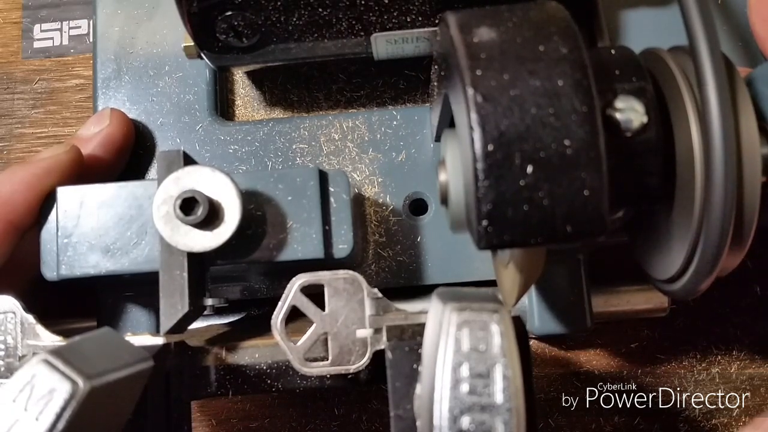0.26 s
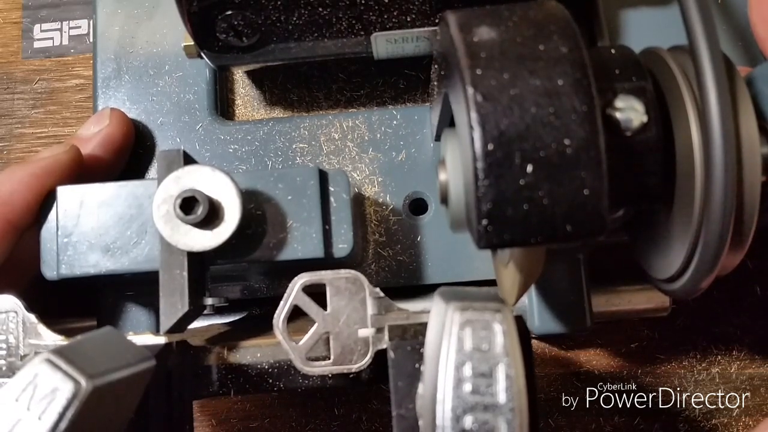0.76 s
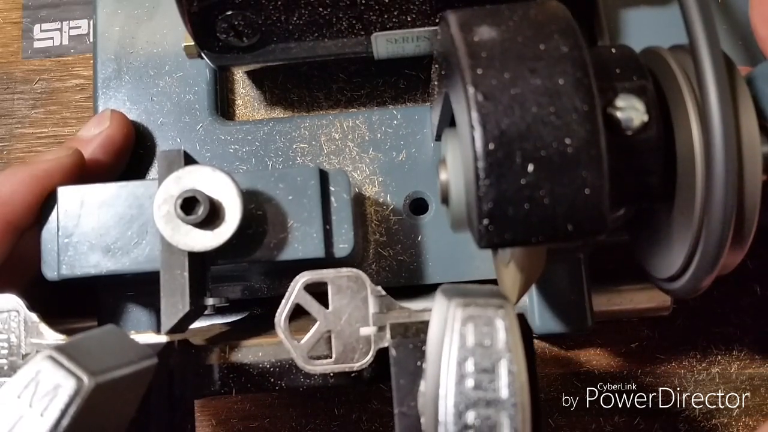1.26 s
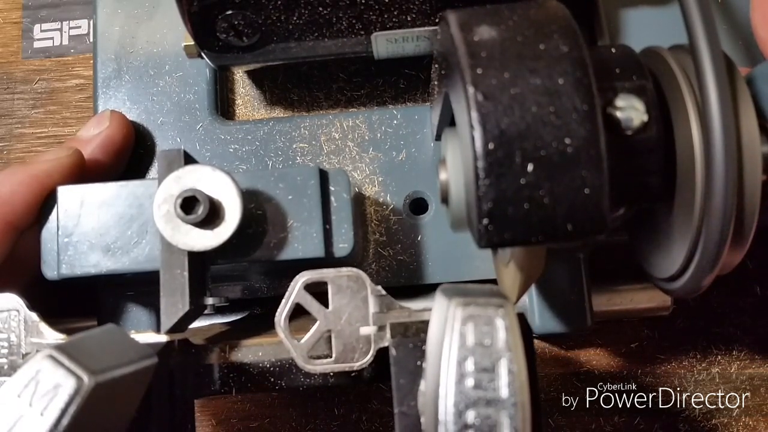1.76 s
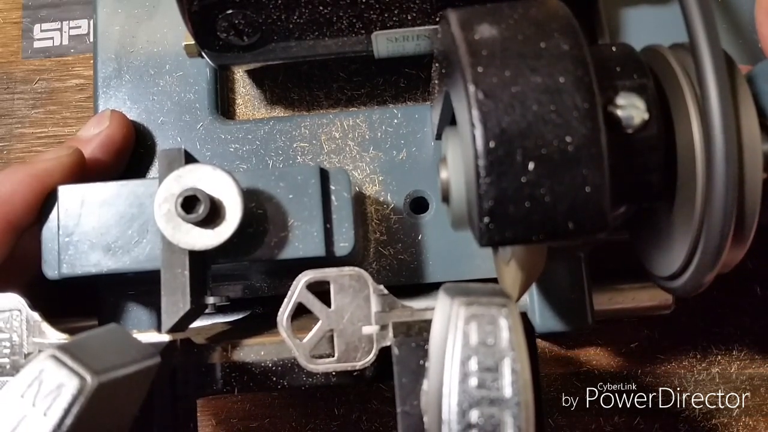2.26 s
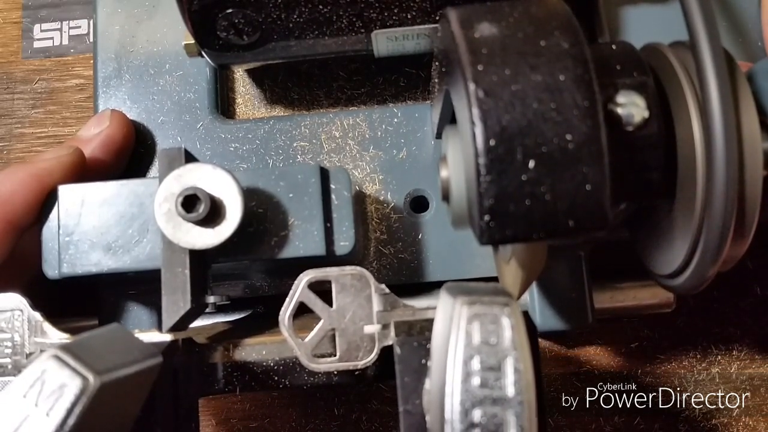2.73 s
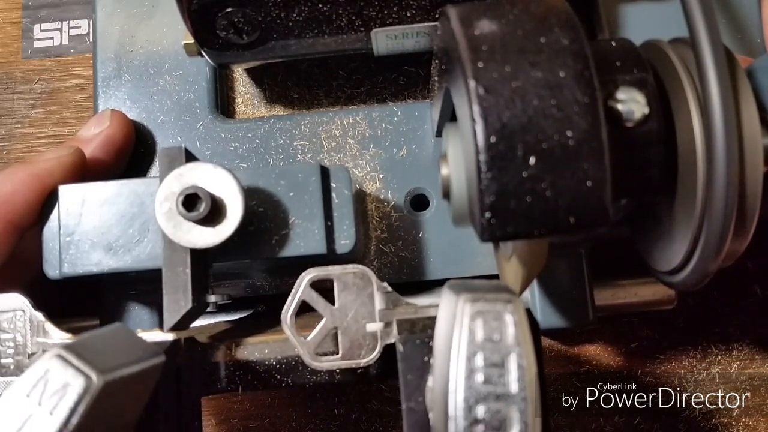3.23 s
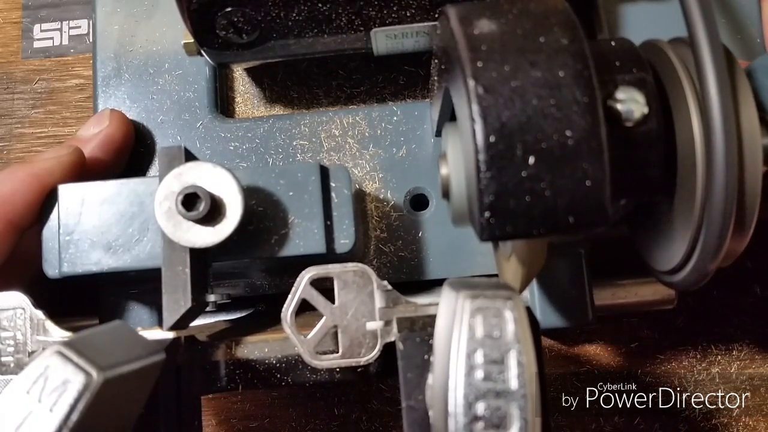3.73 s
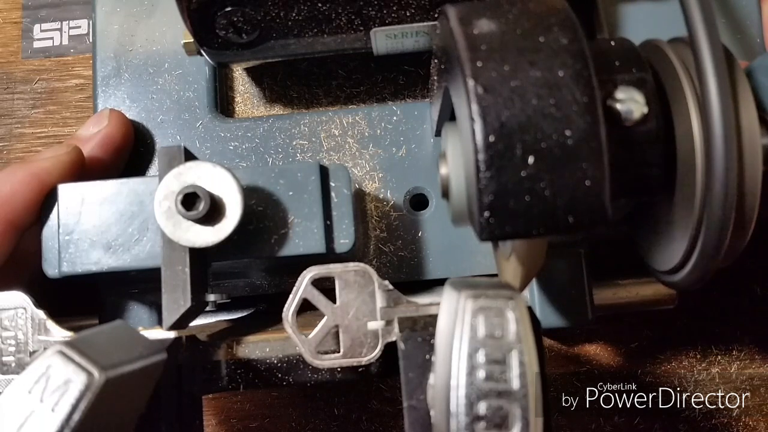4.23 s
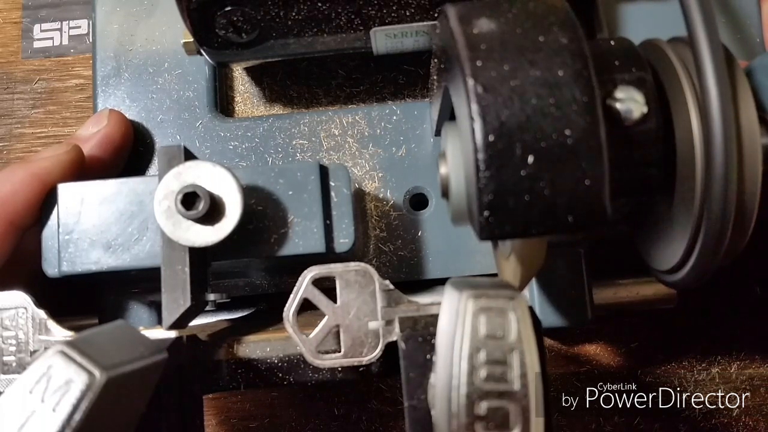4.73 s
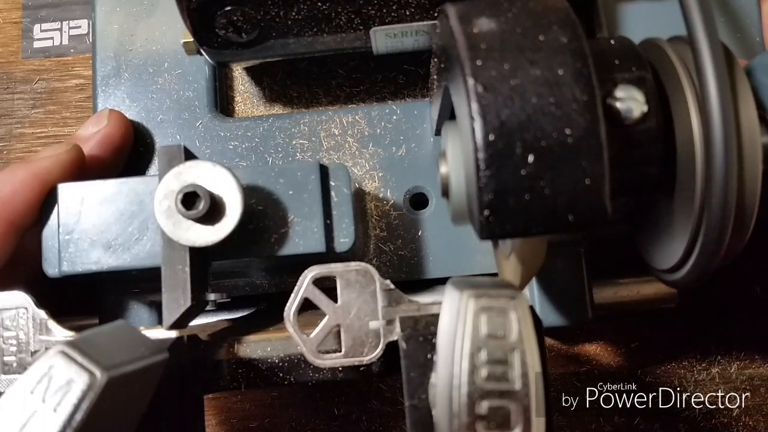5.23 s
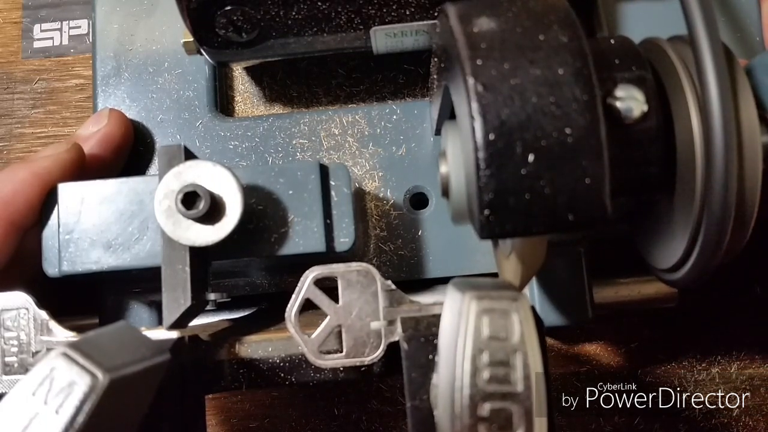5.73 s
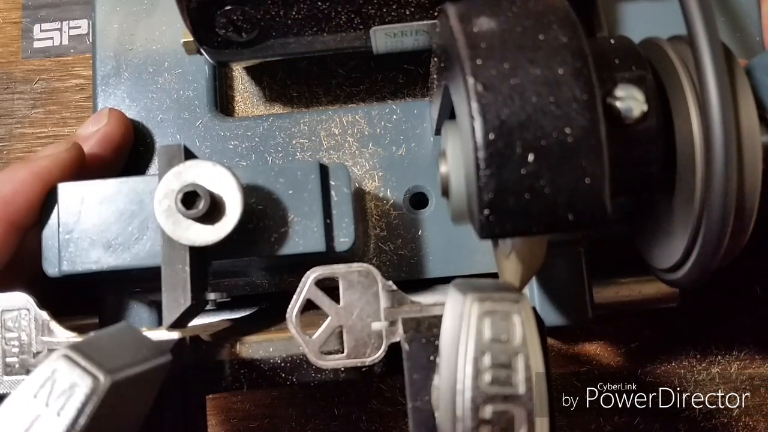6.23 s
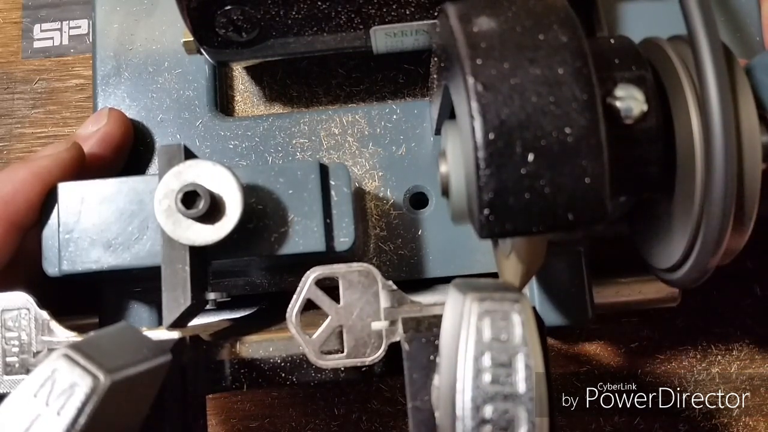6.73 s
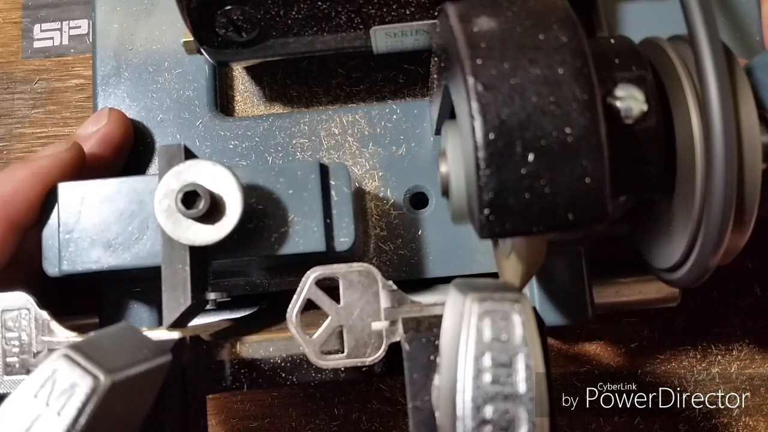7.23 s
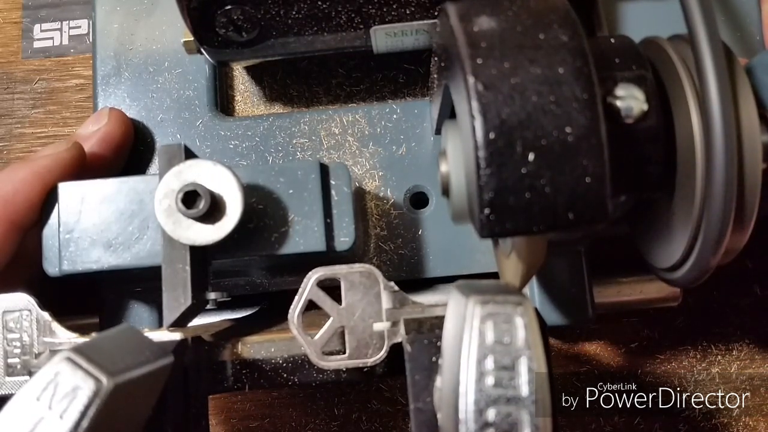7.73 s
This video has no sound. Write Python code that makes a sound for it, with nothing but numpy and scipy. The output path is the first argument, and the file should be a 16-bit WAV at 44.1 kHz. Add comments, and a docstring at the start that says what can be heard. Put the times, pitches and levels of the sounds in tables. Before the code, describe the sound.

A key duplicating machine runs on a workbench, heard from just above the cutter. Its electric motor holds a strong, steady hum with a buzzing edge, a low rumble and a constant rasp. Over this, the clamped key and its carriage chatter against the wheel with a fast metallic rattle. The chatter eases near the middle, then bites hardest soon after. The machine is still running at the end.

```python
"""A key duplicating machine runs on a workbench, heard from just above the cutter.
From the start its fast mains motor hums, the brushes rasp and a belt turns the cutter spindle at under
half the motor's speed. Whenever the two shafts swing the same way, the clamped key and its carriage
chatter. The chatter eases towards 4 s as the cut gets shallower, then is hardest around 6 s, where the
cutter bites deep. The machine is still running at the end."""
import sys
import numpy as np
from scipy import signal
from scipy.fft import rfft, irfft
from scipy.io import wavfile
from scipy.ndimage import uniform_filter1d, minimum_filter1d

SR = 44100
rng = np.random.default_rng(int(sys.argv[2]) if len(sys.argv) > 2 else 0)


def int16_out(signal):
    """Quantize to a 16-bit WAV file."""
    q = np.round(np.clip(np.atleast_2d(signal).T, -1, 1) * 32767)
    wavfile.write(sys.argv[1], SR, q.astype(np.int16))


N = 351918
TIME = np.arange(N) / SR
RIPPLE_HZ = 120   # mains peaks


def from_db(db):
    return 10 ** (np.asarray(db) / 20)


def unit_rms(x):
    return x / np.sqrt(np.mean(x ** 2) + 1e-20)


def swing(turns):
    return np.cos(2 * np.pi * turns)


def automation(rows):
    """One curve per column, drawn through the times in the first column."""
    times, *columns = np.transpose(rows)
    return [np.interp(TIME, times, column) for column in columns]


def travel_db(mid_db, rise_db_per_s, mid_travel_s=4.0):
    """A level that changes steadily as the carriage moves along the key."""
    return mid_db + rise_db_per_s * (TIME - mid_travel_s)


def drift(hz):
    """A random wander of spread 1, changing about hz times a second."""
    freqs = np.fft.rfftfreq(N, 1 / SR)
    return unit_rms(equalise(rng.standard_normal(N), 1 / (1 + (freqs / hz) ** 2) ** 2))


def eq_curve(points):
    """Points of frequency and level as gains on the FFT grid."""
    hz, db = np.transpose(points)
    return from_db(np.interp(np.log(np.fft.rfftfreq(N, 1 / SR) + 1), np.log(hz), db))


def equalise(x, gains):
    return irfft(rfft(x) * gains, N)


def resonate(x, hz, width_hz):
    """A resonance with gain 1 at its peak."""
    radius = np.exp(-np.pi * width_hz / SR)
    feedback = [1, -2 * radius * np.cos(2 * np.pi * hz / SR), radius ** 2]
    return signal.lfilter(np.array([1, 0, -1]) * (1 - radius ** 2) / 2, feedback, x)


def ring(clicks, hz, t60_s):
    """A unit click sets a sine of height 1 ringing."""
    radius, angle = np.exp(-np.log(1000) / (t60_s * SR)), 2 * np.pi * hz / SR
    feedback = [1, -2 * radius * np.cos(angle), radius ** 2]
    return signal.lfilter([0, np.sin(angle)], feedback, clicks + 1e-18)


def enclosure(x, t60_s, wet_db):
    """Dense short echoes between casting, motor and bench, behind the direct sound."""
    t = TIME[:SR // 4]
    echoes = rng.standard_normal(len(t)) * from_db(-60 * t / t60_s)
    return x + from_db(wet_db) * signal.fftconvolve(x, echoes / np.linalg.norm(echoes))[:N]


def shaft_turns():
    """Running angles of motor and cutter, in turns; both speeds waver slightly."""
    # shaft speeds: time_s, motor_hz, cutter_hz
    speeds = [(0.0, 182.69, 80.4), (0.5, 182.75, 80.48), (1.0, 183.3, 80.69), (1.5, 183.42, 80.44),
              (2.0, 183.21, 80.8), (2.5, 183.6, 80.6), (3.0, 183.58, 80.86), (3.5, 184.18, 80.87),
              (4.0, 183.58, 80.72), (4.5, 183.7, 80.67), (5.0, 183.72, 80.88), (5.5, 183.66, 80.57),
              (6.0, 183.55, 80.64), (6.5, 183.01, 80.77), (7.0, 183.15, 80.8), (7.5, 183.57, 80.54),
              (8.0, 184.33, 81.79)]
    return np.cumsum(automation(speeds), axis=1) / SR


def rotor_hum(motor, trim_db=0.57, wobble_db=0.57, belt_hz=4.78):
    """The rotor's unbalance shakes the frame once and twice a turn."""
    # shake once a turn: time_s, relative_level_db
    shake = [(0.1, -10), (1.19, -9.5), (1.62, -13), (2.1, -10), (3.4, -11), (3.55, -13), (5.75, -12.5),
             (6.4, -14.5), (7.83, -12), (7.9, -13)]
    first_db = automation(shake)[0] + trim_db
    first_db += wobble_db * swing(belt_hz * TIME - 1 / 3)   # a wobble, probably once a lap of the belt
    second_db = travel_db(-15, rise_db_per_s=0.7)
    first = from_db(first_db + 0.38 * drift(35)) * np.sin(2 * np.pi * motor)
    second = from_db(second_db + 1.01 * drift(20)) * np.sin(2 * np.pi * 2 * motor + np.pi / 4)
    return np.sqrt(2) * (first + second)


def motor_buzz(motor, cutter, waver_db=1.13, slip_turns=0.046):
    """The motor's higher overtones, and its beats with the cutter and the mains."""
    # overtones from the fifth up: motor_multiple, mid_travel_db, rise_db_per_s
    upper = [(5, -39.5, 0.94), (6, -29.5, 0.66), (7, -39, 0), (8, -41.5, 0.9), (9, -41.5, -0.7),
             (10, -38.5, -0.1), (11, -42, 0), (12, -49.5, -1.5), (13, -44.5, 0.5)]
    # two overtones that swell and fade: time_s, third_db, fourth_db
    middle = [(0, -39, -47), (.8, -35, -41.5), (1.35, -42, -31), (2.3, -46, -34.5), (3.1, -34.5, -34.5),
              (4.4, -44.5, -35.5), (5.8, -32, -32), (6.5, -39, -34.5), (6.8, -35, -46), (7.55, -25.5, -47),
              (8, -36.5, -44)]
    # beat tones: motor_multiple, cutter_multiple, ripple_multiple, mid_travel_db, rise_db_per_s
    beats = [(0, 1, 0, -56, -1.3), (1, -1, 0, -45.5, 1.6), (0, 2, 0, -43.5, 1.5), (1, 1, 0, -33.5, 0.5),
             (2, -1, 0, -40.5, 0.8), (3, -2, 0, -34.5, 0.9), (2, 1, 0, -48.5, 1), (3, -1, 0, -37.5, -0.5),
             (2, 0, -1, -39, -1), (3, 0, -1, -36.5, 1.5), (5, 0, 1, -51, 0), (7, 0, -1, -44, -1.5),
             (10, 0, -1, -40.5, 0.3), (10, 0, 1, -39.5, -0.1), (12, 0, -1, -43.5, 0.5)]
    overtones = [(order, travel_db(db, rise)) for order, db, rise in upper]
    overtones += enumerate(automation(middle), start=3)
    tones = np.zeros(N)
    for order, db in overtones:
        level = from_db(db + waver_db * drift(6.5))
        tones += level * swing(order * motor + slip_turns * drift(21) + rng.random())
    for of_motor, of_cutter, of_ripple, db, rise in beats:
        turns = of_motor * motor + of_cutter * cutter + of_ripple * RIPPLE_HZ * TIME
        tones += from_db(travel_db(db, rise)) * swing(turns + rng.random())
    return np.sqrt(2) * tones


def frame_rumble(motor, cutter, throb_db=5.0, beat_db=1.5):
    """The heavy frame passes on the low end of the friction, throbbing with each motor turn."""
    # tone of frame and bench: frequency_hz, relative_level_db
    spectrum = [(20, -41.5), (70, -24), (110, -10), (165, -6), (255, 2), (320, -1.5), (400, -1.5),
                (505, -7.5), (660, -2.5), (720, -11.5), (800, -7.5), (1000, -13), (2000, -56.5)]
    press_db = throb_db * swing(motor - .4) + beat_db * swing(motor - 2 * cutter - .14)
    friction = rng.standard_normal(N) * from_db(press_db)
    return unit_rms(equalise(friction, eq_curve(spectrum)))


def brush_rasp(motor, cutter, once_db=1.0, twice_db=.6, cutter_db=.9, beat_db=.8, ripple_db=1.3):
    """Sliding contact, pressed harder with each turn, each mains peak and the shafts' slow beat."""
    # tone of brushes and cutter: frequency_hz, relative_level_db
    spectrum = [(400, -22), (900, -8.5), (1200, -0.5), (1600, -0.5), (1800, -6), (2300, -7.5), (3200, -13),
                (3700, -16), (5000, -21), (6200, -25), (7300, -38.5), (8500, -37.5), (10000, -45.5),
                (14000, -57.5)]
    # bright ring of small steel parts: pitch_hz, width_hz, relative_level_db
    steel_modes = [(5280, 45, -27), (8640, 280, -46.5), (10660, 190, -44.5), (11600, 180, -44),
                   (12450, 400, -38.5), (14700, 90, -42.5)]
    press_db = once_db * swing(motor - .2) + twice_db * swing(2 * motor)
    press_db += cutter_db * swing(cutter - .08) + beat_db * swing(motor - 2 * cutter - .1)
    press_db += ripple_db * swing(RIPPLE_HZ * TIME)
    friction = rng.standard_normal(N) * from_db(press_db + 2.0 * drift(520))   # fast drift adds grit
    sizzle = sum(from_db(db) * resonate(friction, hz, width) for hz, width, db in steel_modes)
    rasp = equalise(friction, eq_curve(spectrum)) + sizzle
    return unit_rms(enclosure(rasp, t60_s=0.19, wet_db=-8))


def cutter_bite(jolt_half_s=0.03, unsteady_db=1.8):
    """Depth of the cut in dB: the shape of the key, brief jolts and an unsteady hand."""
    # bite along the key: time_s, depth_db
    profile = [(0, 1.5), (1.0, 1.1), (2.0, -.5), (2.8, -1.2), (3.7, -3), (5.3, -.5), (5.7, -0.5),
               (5.9, 3.5), (6.4, 2), (6.9, 1), (8, 1.5)]
    # the cutter catches (+) or runs slack (-): centre_s, change_db
    jolts = [(1.44, -3), (1.65, -9), (1.93, -6.5), (2.12, 5.5), (2.2, -16), (2.86, 0), (3.1, -6),
             (3.93, -1), (5.33, -8), (5.43, 3.5), (5.56, 7), (5.69, -8), (7.48, -11), (7.76, -6)]
    jolt_db = sum(db * np.exp(-((TIME - centre_s) / jolt_half_s) ** 2) for centre_s, db in jolts)
    return automation(profile)[0] + jolt_db + unsteady_db * drift(14)


def knocks(motor, cutter, in_step_db=17, beat_db=2.5, scatter_db=1.6,
           rebound_s=.0017, rebound_db=-8, jitter_s=.0003):
    """One knock a motor turn, hardest when the cutter swings with it, and two rebounds."""
    onsets = np.flatnonzero(np.diff(np.floor(motor - .1)))   # a tenth of the way into each turn
    in_step = (1 + swing(cutter[onsets] - .04)) / 2
    knock_db = in_step_db * in_step ** 2 + beat_db * swing(2 * cutter[onsets] + .05)
    bounce = np.arange(3)[:, None]
    timing_luck, force_luck = rng.standard_normal((2, len(bounce), len(onsets)))
    delay_s = bounce * rebound_s + jitter_s * (1 + bounce) * timing_luck
    hit_samples = np.clip(onsets + delay_s * SR, 0, N - 1).astype(int)
    forces = from_db(knock_db + rebound_db * bounce + scatter_db * np.tanh(force_luck))
    return hit_samples.ravel(), forces.ravel()


def struck(hits, modes, contact_hz, wet_db):
    """The point of contact wanders, so each knock rings every mode with its own sign and strength."""
    hit_samples, forces = hits
    ringing = np.zeros(N)
    for hz, db, t60_s in modes:
        share = rng.choice([-1, 1], len(forces)) * rng.uniform(.6, 1, len(forces))
        ringing += from_db(db) * ring(np.bincount(hit_samples, forces * share, N), hz, t60_s)
    soft_contact = signal.butter(4, [500, contact_hz], "band", fs=SR, output="sos")   # dulls the top
    return unit_rms(enclosure(signal.sosfilt(soft_contact, ringing), t60_s=.05, wet_db=wet_db))


def carriage_chatter(hits):
    """The knocks rattle the carriage: a short midrange clack."""
    # carriage resonances: pitch_hz, relative_level_db, t60_s
    modes = [(640, -16, .02), (1250, -10, .008), (1560, -7, .008), (2050, -9, .007), (2420, -2, .016),
             (2650, -3, .011), (2900, -3, .012), (3180, -4, .014), (3290, -2, .022)]
    return struck(hits, modes, contact_hz=3500, wet_db=-6)


def key_chatter(hits):
    """The same knocks ring the key and the cutter wheel: a thin, bright tick."""
    # key and wheel resonances: pitch_hz, relative_level_db, t60_s
    modes = [(4650, -10, .003), (5330, -1, .02), (5450, -7, .016), (5690, -5, .016), (5830, -1, .018),
             (6220, -11, .022), (8500, -19, .005)]
    return struck(hits, modes, contact_hz=6600, wet_db=-5)


def scene():
    """All parts sit close together, so both sides hear one sound in two colours."""
    # the right side is duller: frequency_hz, left_minus_right_db
    balance = [(300, 0.12), (1000, 0.4), (2000, 1.3), (3200, 3.5), (4200, 7), (5400, 10.5), (6500, 8.5),
               (7400, 5.5), (8000, 0)]
    motor, cutter = shaft_turns()
    bite_db = cutter_bite()
    hits = knocks(motor, cutter)
    key_db = travel_db(-48, rise_db_per_s=0.16)   # the key rings more freely as the cut moves along it
    # the chatter rides the bite hard, the rasp a little, the rumble hardly at all
    machine = from_db(-33.5 + bite_db) * carriage_chatter(hits)
    machine += from_db(key_db + 1.7 * bite_db) * key_chatter(hits)
    machine += rotor_hum(motor) + motor_buzz(motor, cutter)
    machine += from_db(-23.5 - 0.018 * bite_db) * frame_rumble(motor, cutter)
    machine += from_db(-25.5 + 0.19 * bite_db) * brush_rasp(motor, cutter)
    right = equalise(machine, 2 / (1 + eq_curve(balance)))
    left = 2 * machine - right
    return np.array([left, right])


def record(dry, ceiling=.92, cutoff_hz=15300):
    """A smooth limiter holds the highest peaks; a steep low-pass cuts the top."""
    safe_gain = np.minimum(1, ceiling / (np.abs(dry).max(axis=0) + 1e-9))
    gain = uniform_filter1d(minimum_filter1d(safe_gain, size=301), size=301)
    low_pass = signal.ellip(10, .1, 80, cutoff_hz, fs=SR, output="sos")
    return signal.sosfilt(low_pass, dry * gain)


dry = scene()
out = record(dry)
int16_out(out)
```